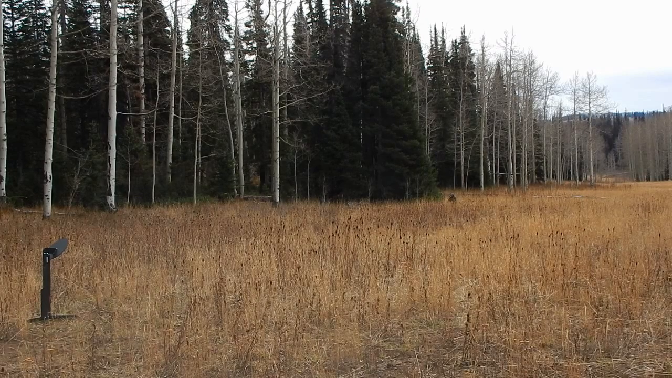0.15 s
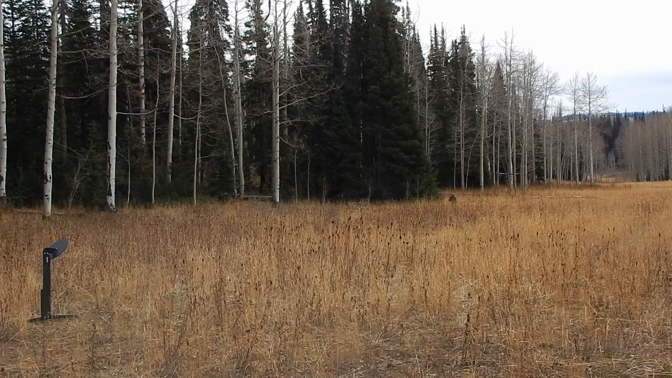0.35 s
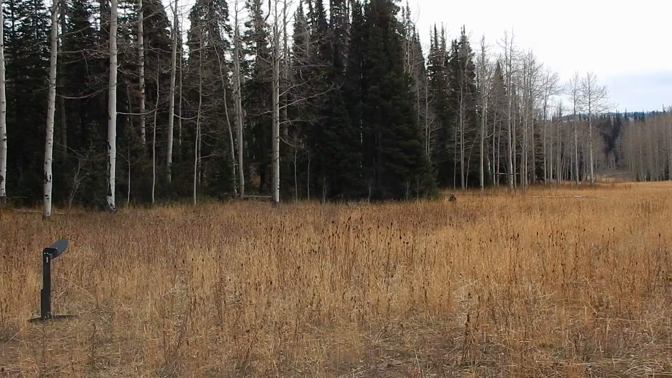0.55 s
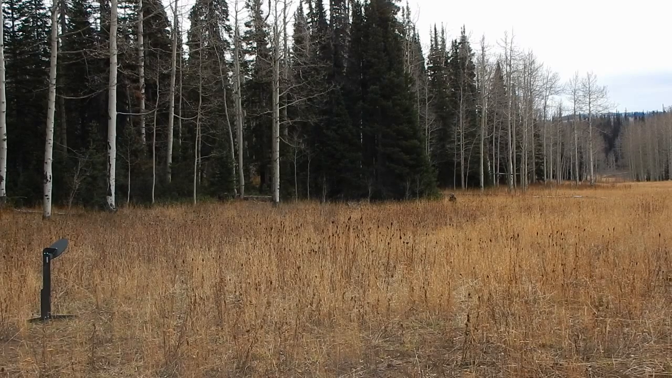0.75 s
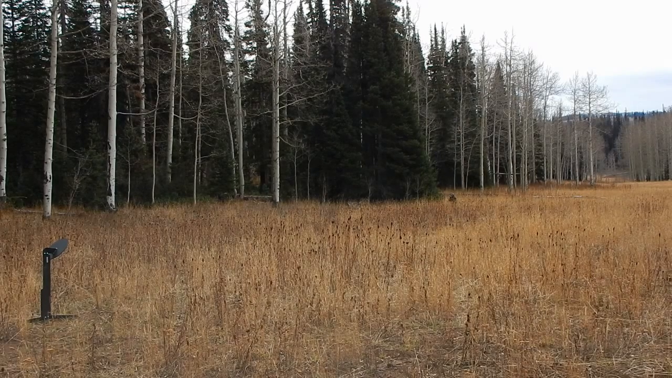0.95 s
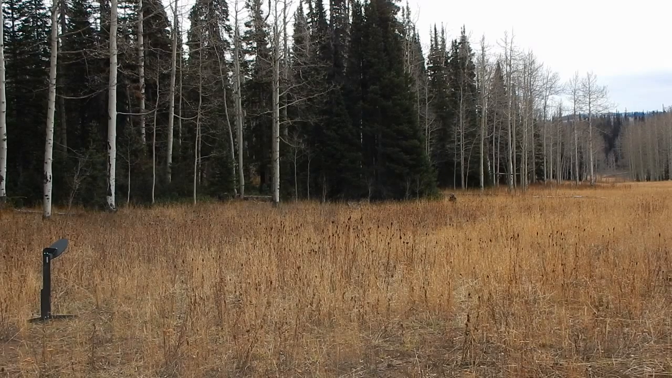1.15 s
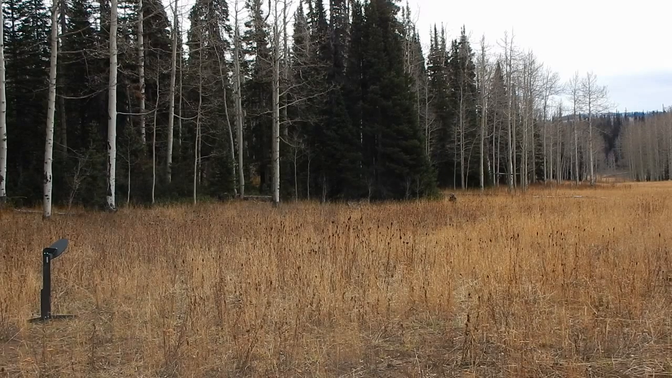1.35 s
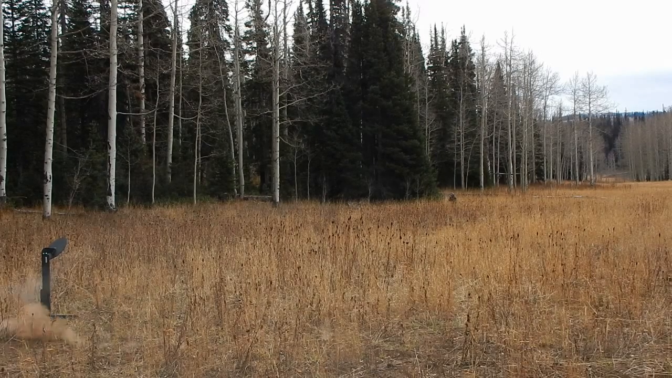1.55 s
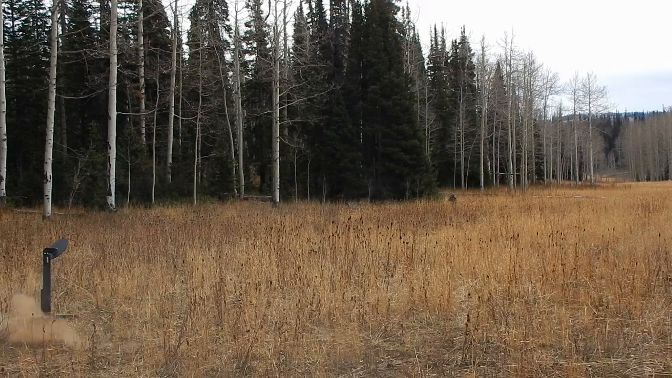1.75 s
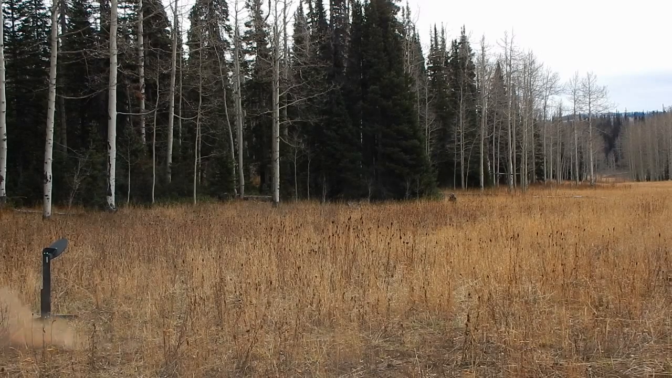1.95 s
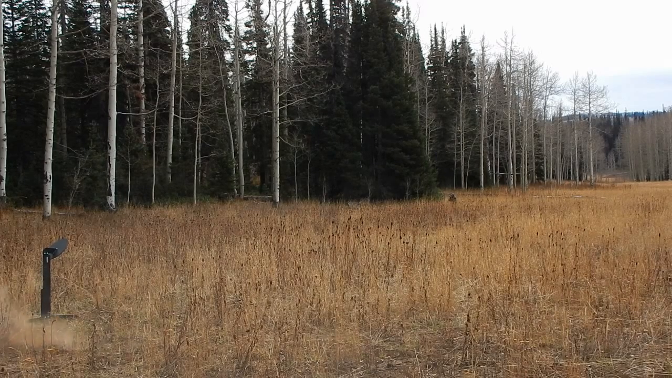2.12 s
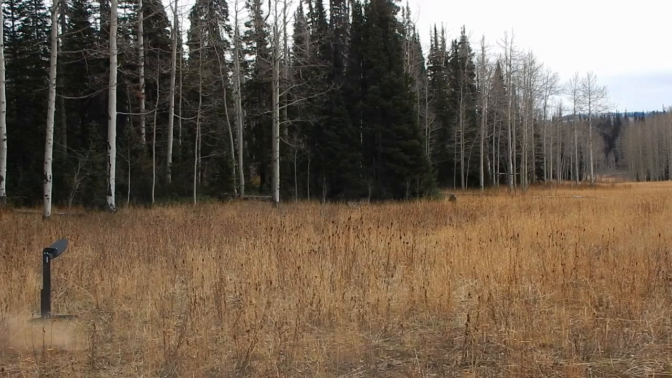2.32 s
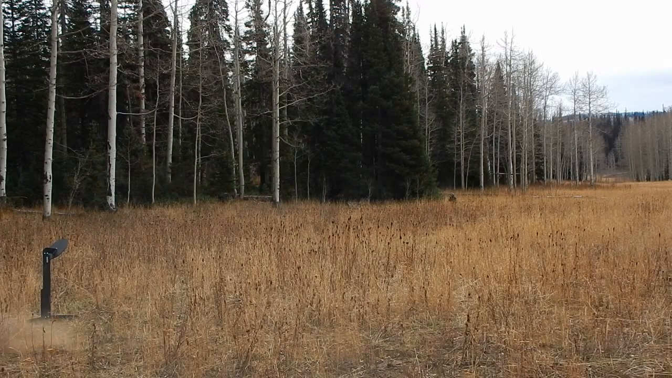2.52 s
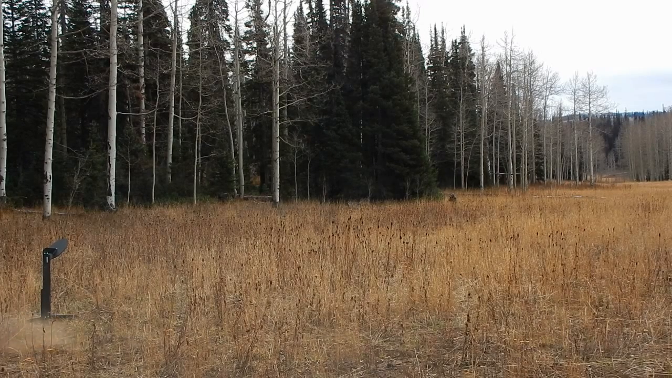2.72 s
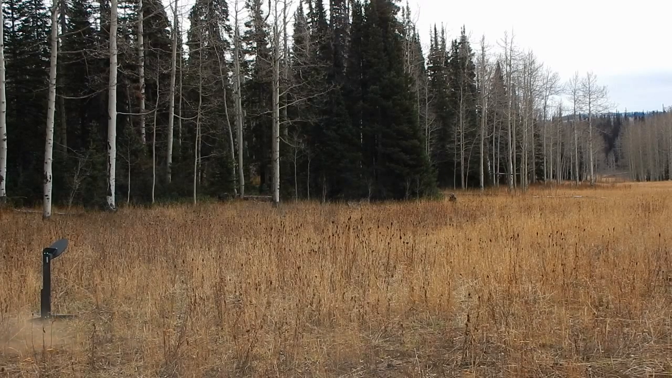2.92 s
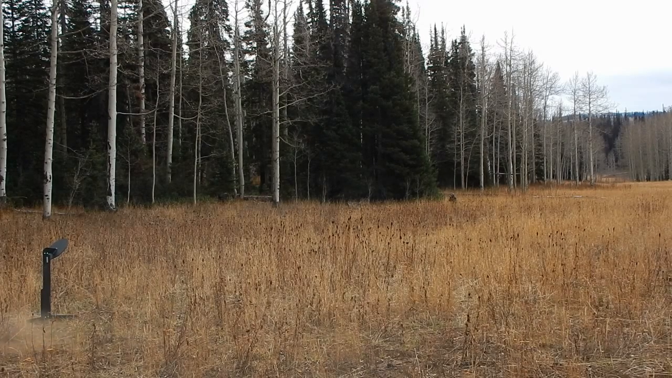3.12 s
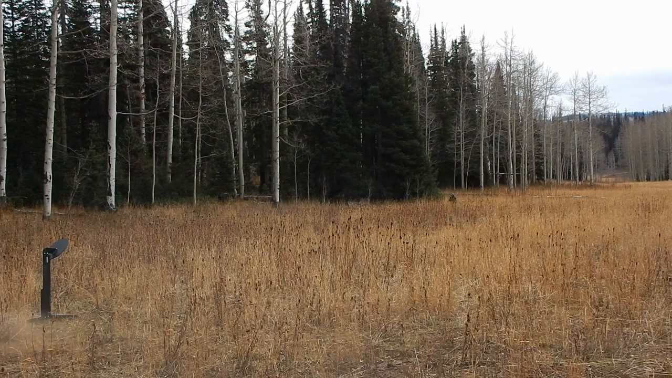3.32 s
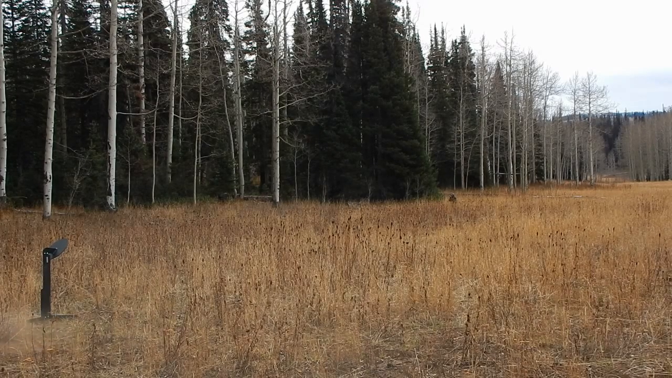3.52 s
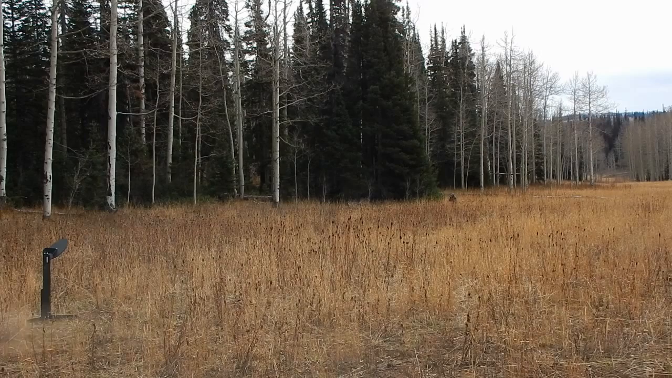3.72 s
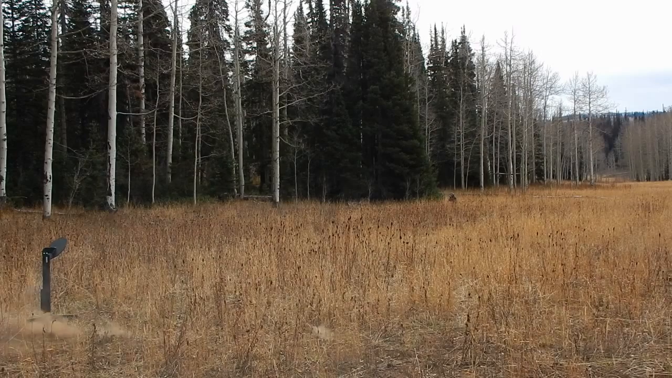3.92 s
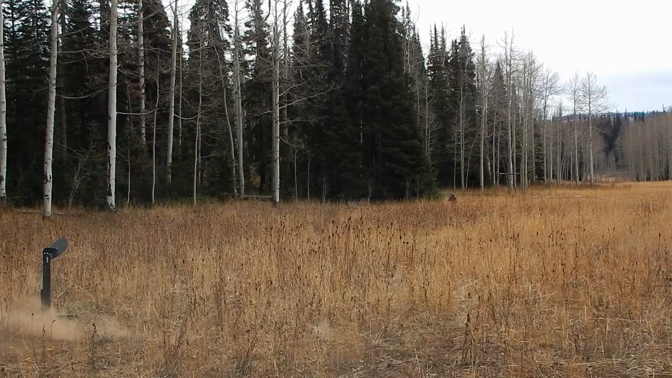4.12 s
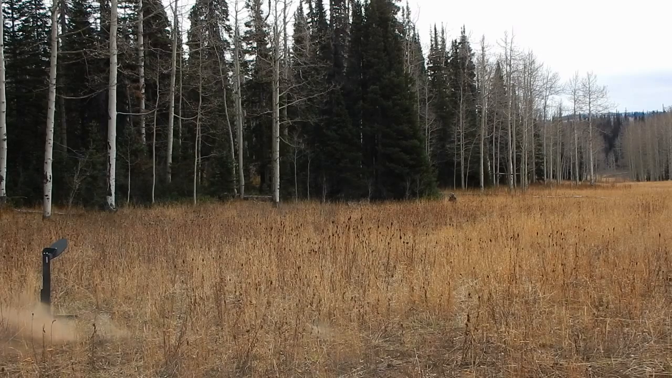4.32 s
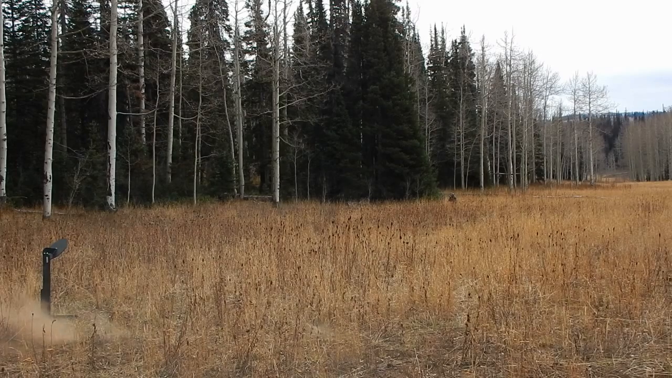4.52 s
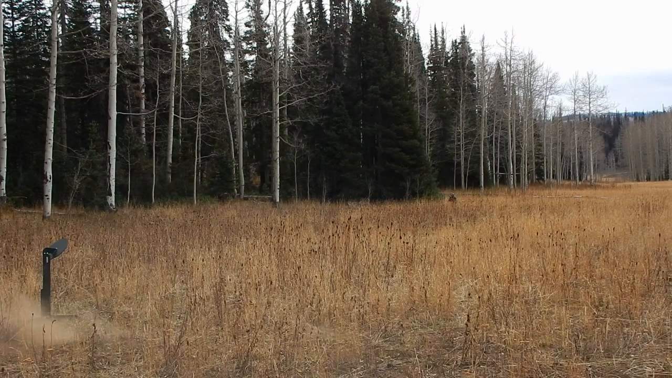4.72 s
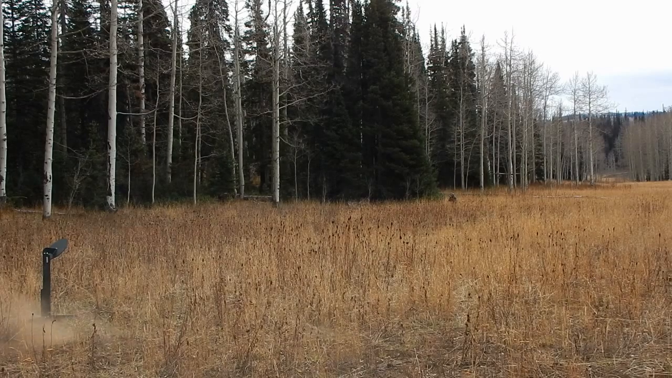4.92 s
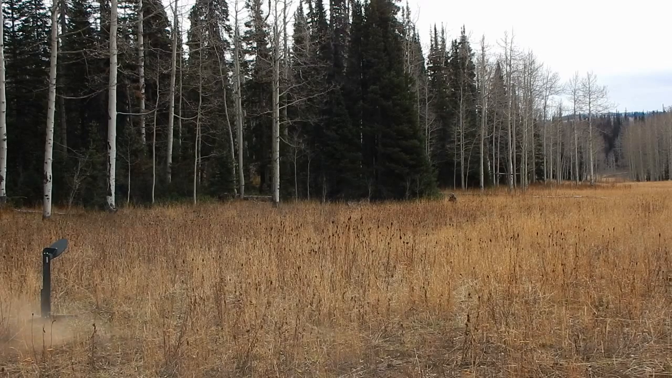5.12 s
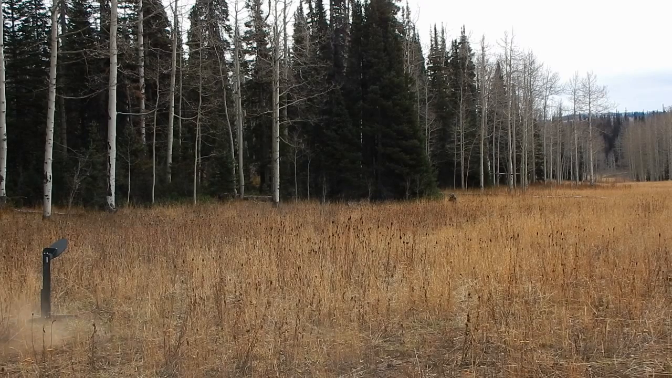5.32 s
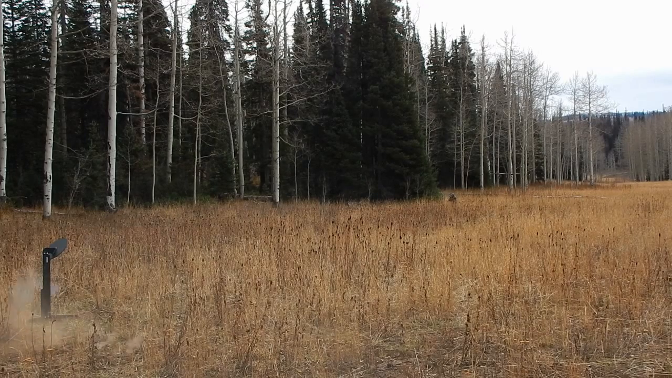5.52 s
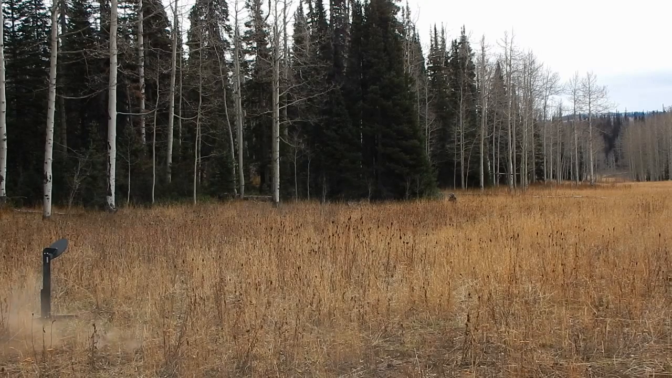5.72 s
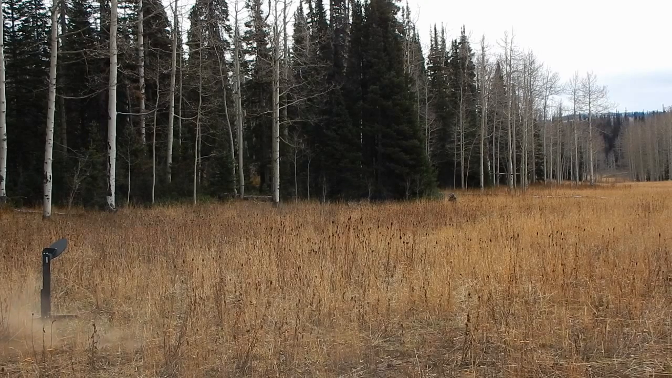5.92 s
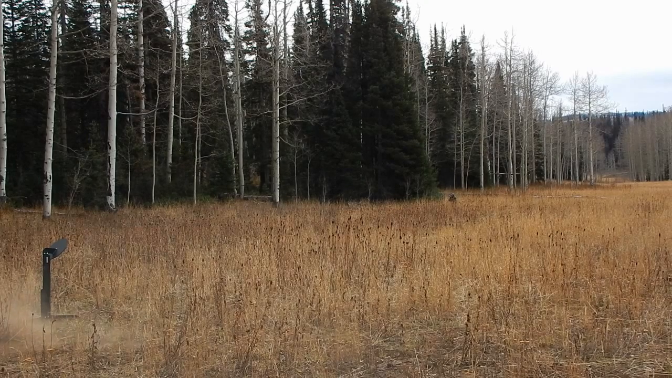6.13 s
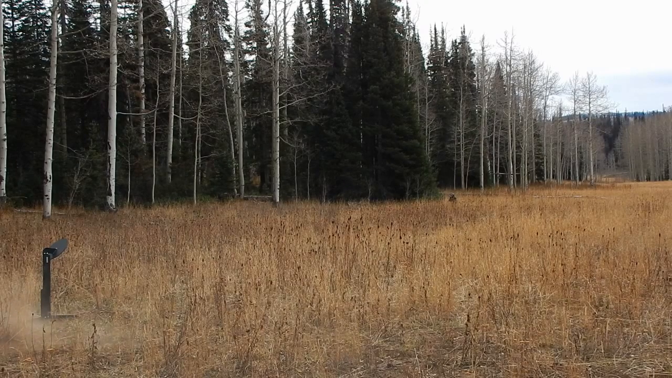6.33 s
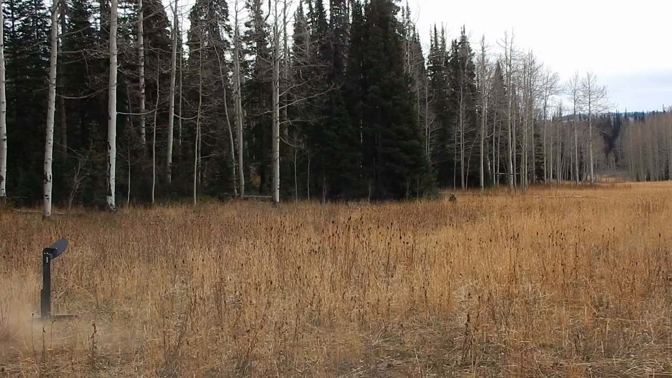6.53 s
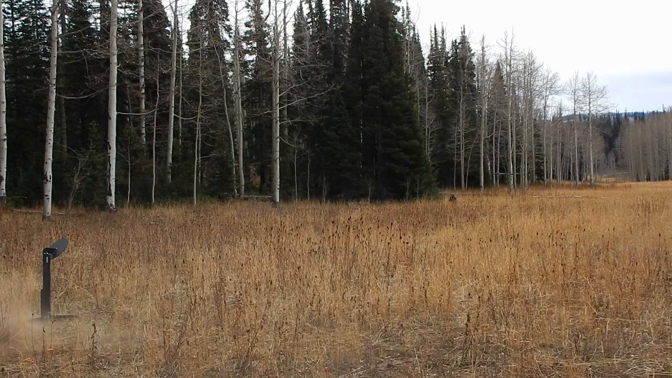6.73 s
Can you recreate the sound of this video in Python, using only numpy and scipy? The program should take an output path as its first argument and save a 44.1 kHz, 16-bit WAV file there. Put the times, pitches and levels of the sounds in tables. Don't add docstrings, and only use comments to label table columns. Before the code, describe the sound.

Outdoors in a grassy meadow beside forest, an earlier shot's echo fades under small dry ticks and one sharp metallic snap. Then three rifle bullets hit a steel plate close to the microphone: crack, bright clang, and almost instantly the muzzle blast. Echoes roll from trees and slopes. The camera's automatic level ducks at each bang, then lifts the ring, echo and hiss again.

```python
import sys
import numpy as np
from scipy import signal
from scipy.fft import rfft, irfft
from scipy.io import wavfile
from scipy.ndimage import uniform_filter1d

SR = 44100
rng = np.random.default_rng(int(sys.argv[2]) if len(sys.argv) > 2 else 0)


def store_pcm(level_fs):
    pcm = np.round(np.clip(level_fs, -1, 1) * 32767).astype(np.int16)
    wavfile.write(sys.argv[1], SR, np.atleast_2d(pcm).T)


def makeup_ratio(level_db):
    decades = np.asarray(level_db, float) / 20
    return 10 ** decades


N = 302526
SHORT = 2000
EARLIER_BLAST_S = -0.74

IMPACTS = [1.4700, 3.9197, 5.5539]
BLASTS = [1.5260, 3.9750, 5.6092]
# start in seconds, peak in dB, pitch in Hz, T60 in seconds,
# noise share 0-1, rebound share 0-1.
SNAP = (1.1042, -6, 5750, .010, .7, .8)
# frequency in Hz, density in dB per Hz.
SPLATTER = [(100, -24), (600, -12), (1500, -5.5), (3300, -1.5), (3700, 2.5), (4080, -26), (4500, -5),
            (5600, 0), (7000, -10), (10000, -35), (16000, -47)]


def read(points, hz, axis=1):
    rows = np.transpose(points)
    return np.interp(np.log(hz + 1), np.log(rows[0] + 1), rows[axis])


def add(mix, s, sound):
    part = mix[round(s * SR):][:len(sound)]
    part += sound[:len(part)]


def coloured(points, count):
    spectrum = rfft(rng.standard_normal(count))
    x = irfft(spectrum * makeup_ratio(read(points, np.fft.rfftfreq(count, 1 / SR))), count)
    return x / x.std()


def pressure_pulse(length_ms):
    u = np.arange(SHORT) / (SR * length_ms / 1000)
    return (1 - u) * np.exp(-u)


def gain_db():
    recovery_db_per_s = 17
    t = np.arange(N) / SR
    ducks = [(EARLIER_BLAST_S, -30.5), (SNAP[0] + .0013, -10.5)]  # (s, dB right after the bang)
    ducks += [(s, -29) for s in IMPACTS]
    ducks += [(s + .0005, -30) for s in BLASTS]
    falls = [np.where(t >= s, db + recovery_db_per_s * (t - s), 0) for s, db in ducks]
    lowest = np.minimum(np.min(falls, axis=0), 0)
    return uniform_filter1d(lowest, size=24)


def echoes():
    # frequency in Hz, level in dB, T60 in seconds.
    trees = [(80.2, -15, 0.66), (179, -2.5, 1), (600, -2, 0.97), (1500, 0, 0.81), (2770, -3, 0.86),
             (3280, -1, 0.84), (4360, -11, 0.92), (5480, -7, 0.68), (8200, -30.5, 0.53),
             (12000, -54.5, 0.29), (16000, -61, .25)]
    # frequency in Hz, level in dB, T60 in seconds.
    slopes = [(80, -21, 3.7), (248.3, -3, 3.65), (594, 1, 3.41), (840, -2.5, 3.24), (1900, -0.5, 2.524),
              (3466, -2, 1.82), (4440, -13, 1.61), (5640, -9.5, 1.42), (6450, -26, 1.4), (8000, -40.5, 1.2),
              (16000, -73.5, 1.1)]
    delay_s = 0.028
    frame, hop = 512, 128
    hz = np.fft.rfftfreq(frame, 1 / SR)
    t = np.arange(N // hop + 5) * hop / SR
    power = np.zeros((len(hz), len(t)))
    for table, db, rise_s in ((trees, 16.5, .004), (slopes, 4.5, .15)):
        start_db = db + read(table, hz)[:, None]
        t60 = read(table, hz, axis=2)[:, None]
        for s in [EARLIER_BLAST_S] + BLASTS:
            age = t - s - delay_s
            on = (age > 0) & (age < 1.5 * t60.max())
            fading = makeup_ratio(2 * (start_db - 60 * age[on] / t60))
            power[:, on] += fading * np.minimum(age[on] / rise_s, 1)
    a, b, patches = rng.standard_normal((len(t), len(hz), 3)).T
    patches = uniform_filter1d(uniform_filter1d(patches, size=12, axis=0), size=10, axis=1)
    lumps = uniform_filter1d(rng.standard_normal(len(t)), size=6)
    unevenness_db = 0.99 * patches / patches.std() + .6 * lumps / lumps.std()
    z = (a + 1j * b) * np.sqrt(power) * makeup_ratio(unevenness_db - 18)
    return signal.istft(z, nperseg=frame, noverlap=frame - hop)[1][:N]


def air():
    # frequency in Hz, density in dB per Hz.
    hiss = [(30, -12.5), (150, 6), (600, 9.5), (2000, -2.5), (3300, -4.5), (4600, -7), (5650, -1.5),
            (6300, -8.5), (7000, -21), (7800, -11), (8400, -9), (9000, -21), (9600, -23.5), (10300, -26),
            (16000, -30)]
    return makeup_ratio(-44) * coloured(hiss, N)


def crackle():
    t = np.arange(SHORT) / SR
    size = makeup_ratio(-52 + 4.7 * np.minimum(rng.exponential(1, N), 3.2)) * (rng.random(N) < 120 / SR)
    soft = 1 - np.exp(-(t / .0004) ** 2)
    ring = 1.5 * soft * makeup_ratio(-60 * t / 0.0071) * np.sin(2 * np.pi * 5600 * t)
    return signal.oaconvolve(size, ring)[:N]


def wind():
    # peak time in seconds, level in dB as heard.
    gusts = [
        (0.28, -49),
        (0.86, -47.5),
        (3.2, -51),
        (3.58, -35.5),
        (3.86, -43.5),
        (5.48, -48),
        (6.8, -48),
    ]
    rise_s, fade_db_per_s = 0.056, 49
    t = np.arange(N) / SR
    strength = makeup_ratio(-56)
    for s, db in gusts:
        drop_db = np.where(t < s, 20 * (s - t) / rise_s, fade_db_per_s * (t - s))
        strength = strength + makeup_ratio(db - drop_db)
    rumble = coloured([(15, -30.5), (40, -9.5), (90, -2), (160, -23.5), (400, -71.5)], N)
    return strength * rumble


def add_tick(mix, s, db, hz, t60, noisy, rebound):
    # frequency in Hz, density in dB per Hz.
    rasp = [(800, -24), (2000, -3.5), (4000, -2.5), (6000, 2.5), (9000, -16.5), (16000, -38.5)]
    t = np.arange(SHORT) / SR
    shape = makeup_ratio(db - 60 * t / t60) * (1 - np.exp(-(t / .0002) ** 2))
    ring = shape * (np.sin(2 * np.pi * hz * t) + noisy * coloured(rasp, SHORT))
    add(mix, s, ring)
    add(mix, s + .00105, rebound * ring)


def ticks():
    # start in seconds, peak in dB as heard, pitch in Hz.
    rows = [(0.0423, -45, 4470), (0.1815, -47, 4360), (0.2244, -40, 5300), (0.6739, -15, 4590),
            (0.6814, -31, 5660), (0.6904, -33, 4660), (0.7053, -35, 5500), (0.8126, -29.5, 5330),
            (0.8455, -33, 5400), (0.9038, -37, 5550), (0.9822, -39, 5480), (1.0144, -28.5, 5600),
            (1.045, -41, 5350), (1.2062, -36, 4830), (1.4245, -31, 4500), (2.135, -38, 4480),
            (2.5067, -36.5, 5660), (2.5262, -31, 5400), (2.6855, -30.5, 5350), (2.787, -28, 5100),
            (3.0324, -43, 4400), (3.6461, -31, 5460), (4.9364, -47, 5520), (5.001, -44, 5130),
            (5.1751, -37, 5400), (5.2076, -41, 5380), (5.232, -33, 5620), (5.3353, -38, 5470),
            (5.4335, -45, 5440), (6.5184, -43, 4310)]
    out = np.zeros(N)
    for s, db, hz in rows:
        add_tick(out, s, db, hz, t60=.005, noisy=.7, rebound=.4)
    return out


def metal_snap():
    # frequency in Hz, level in dB as heard.
    tail = [(6000, -36), (7000, -33), (8000, -36), (9000, -44)]
    out, t = np.zeros(N), np.arange(SHORT) / SR
    add_tick(out, *SNAP)
    add(out, SNAP[0] + .0002, makeup_ratio(-8) * pressure_pulse(.04))
    for hz, db in tail:
        add(out, SNAP[0], makeup_ratio(db - 60 * t / .045) * np.sin(2 * np.pi * hz * t))
    return out


def impact(crack_db, thud_ms, thud_db, ping_db, knock_db):
    # level in dB, T60 in seconds.
    parts = [
        (25.8, 0.041),
        (14.5, .3),
    ]
    knocks = (390, 719, 1080)
    t = np.arange(SR // 2) / SR
    out = coloured(SPLATTER, len(t)) * sum(makeup_ratio(db - 60 * t / t60) for db, t60 in parts)
    crack = makeup_ratio(crack_db) * uniform_filter1d(pressure_pulse(0.052), size=4)
    thud = makeup_ratio(thud_db) * pressure_pulse(thud_ms)
    add(out, 0, crack - thud)
    ping = makeup_ratio(ping_db - 60 * t / 0.024) * np.sin(2 * np.pi * 5686 * t)
    add(out, 0, ping * (1 - np.exp(-(t / .0006) ** 2)))
    knock = sum(np.sin(2 * np.pi * hz * t) for hz in knocks)
    add(out, 0, makeup_ratio(knock_db - 60 * t / 0.03) * knock)
    return out


def plate_ring(hit):
    modes_hz = [888.5, 1461, 1499, 1643, 2292, 2905, 3228.5, 3503, 4082, 4302, 5232, 5511, 6077, 6555, 6826,
                6908, 8125, 8266, 9814, 11440]
    # T60 in seconds, twin offset in Hz, level in dB for each of three hits.
    modes = [(4.82, 1.9, -21.5, -33, -10), (0.9, 1.5, -2.5, -8.5, -6), (.9, 0.5, -13, -5.5, -7.5),
             (.7, 3, 4.5, -8.5, -11), (1.16, -1, 0.5, 8.5, 9.5), (0.65, 4, -8.5, -9, -8.5),
             (1.013, -0.5, 2, 9, 16), (0.45, 8, 3, -7.5, -6), (.12, 10, 2, -6, -6),
             (1.06, 5.5, -12, -5.5, -3), (0.37, 7, 8, 4.5, -5), (0.73, -4, -9, 4, 7),
             (.3, 3.5, 3.5, -9, -3), (.2, 4.5, -13, -8.5, -10), (0.97, 6, -23.5, -11, -7.5),
             (1.72, 1, -33.5, -17.5, -9), (0.67, 5, -19, -26.5, -18.5), (.7, 4, -28, -20, -15),
             (.5, 4.5, -38, -34, -29), (0.55, 0.5, -43, -38, -33)]
    out = np.zeros(3 * SR)
    for hz, (t60, twin_hz, *hit_db) in zip(modes_hz, modes):
        t = np.arange(round(min(1.7 * t60, 3) * SR)) / SR
        fall_db, start = 60 * t / t60, 2 * np.pi * rng.random()
        main = makeup_ratio(-fall_db) * np.sin(2 * np.pi * hz * t + start)
        twin = makeup_ratio(-14 - fall_db / 1.4) * np.sin(2 * np.pi * (hz + twin_hz) * t + start)
        add(out, 0, makeup_ratio(5 + hit_db[hit]) * (main + twin) * np.minimum(t / 0.0057, 1))
    return out


def blast():
    # frequency in Hz, density in dB per Hz.
    grass = [(100, -11.5), (400, -6), (1500, -2.5), (4000, 0.5), (8000, -29.5), (16000, -50.5)]
    t = np.arange(SHORT) / SR
    shock = pressure_pulse(1.2) * np.where(t < .0003, -.9, 1)
    shock = uniform_filter1d(uniform_filter1d(shock, size=9), size=3)
    swing = makeup_ratio(-8 - 60 * t / .037) * np.cos(2 * np.pi * 115 * t + 1.2)
    ring = makeup_ratio(-5 - 60 * t / 0.018) * np.sin(2 * np.pi * 2050 * t)
    rattle = makeup_ratio(-10 - 60 * t / .015) * coloured(SPLATTER, SHORT)
    scatter = makeup_ratio(-23.5 - 60 * t / 0.22) * coloured(grass, SHORT)
    return makeup_ratio(32.5) * (shock + swing + ring + rattle + scatter)


def scene():
    # crack in dB, thud length in ms, thud in dB, housing ping in dB, knock in dB.
    shots = [
        (40.1, 2.37, 21, 25, 7.5),
        (37, 1.9, 16, 23, 14),
        (28, 2.0, 21, 33, 17),
    ]
    as_heard = wind() + ticks() + metal_snap()
    out = echoes() + air() + crackle() + as_heard / makeup_ratio(gain_db())
    for hit, shot in enumerate(shots):
        add(out, IMPACTS[hit], impact(*shot))
        add(out, IMPACTS[hit], plate_ring(hit))
        add(out, BLASTS[hit], blast())
    return out[None]


def roll_off(x):
    return signal.sosfilt(signal.butter(12, 16220, fs=SR, output="sos"), x)


def record(dry):
    # frequency in Hz, gain in dB.
    equaliser = [(0, -31), (70, -12), (190, 1), (310, -5.5), (480, 0), (4005, 0.5), (4078, -15),
                 (4150, -0.5), (15700, 0.5)]
    # frequency in Hz, width in Hz, share let through 0-1.
    notches = [(2500, 380, .03), (2800, 500, .6), (3790, 330, .3), (5000, 120, .3), (6000, 80, .3),
               (7000, 80, .3), (8000, 80, .3), (9000, 100, .3), (10000, 100, .3), (11000, 80, .5)]
    hz, db = np.transpose(equaliser)
    response = makeup_ratio(np.interp(np.fft.rfftfreq(4096, 1 / SR), hz, db))
    taps = np.roll(irfft(response), 441)[:883]
    taps = taps * signal.windows.tukey(len(taps), .15)
    x = signal.oaconvolve(dry[0], taps, "same") * makeup_ratio(gain_db())
    x = signal.lfilter(*signal.butter(2, 50, "high", fs=SR), x)
    for hz, width_hz, leak in notches:
        cut = signal.lfilter(*signal.iirnotch(hz, hz / width_hz, SR), x)
        x = leak * x + (1 - leak) * cut
    band_limit = signal.cheby1(10, .5, 15600, fs=SR, output="sos")
    x = signal.sosfilt(band_limit, np.clip(x, -.96, .96))
    return roll_off(np.clip(x, -1, 1)[None])


dry = scene()
out = record(dry)
store_pcm(out)
```